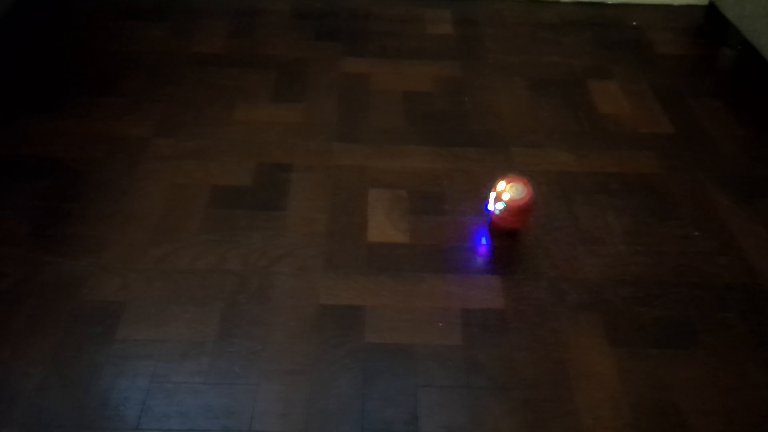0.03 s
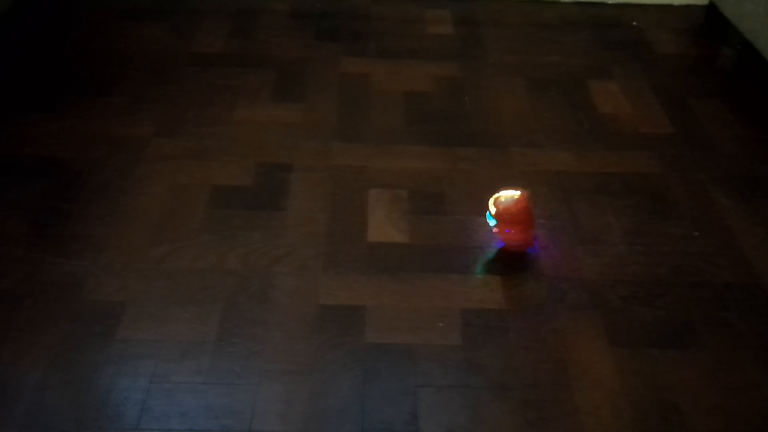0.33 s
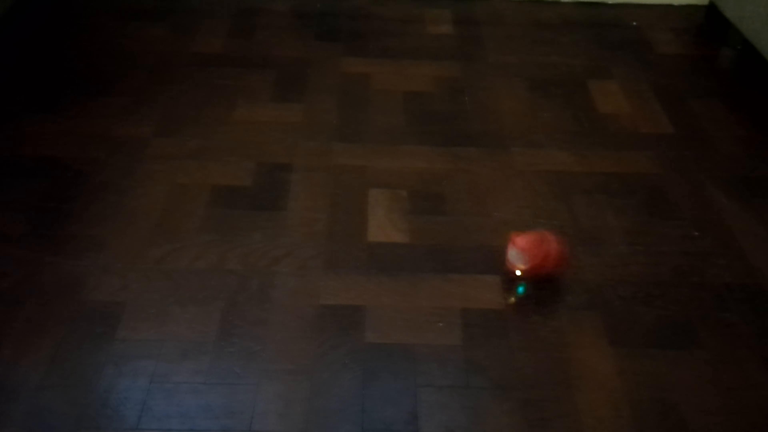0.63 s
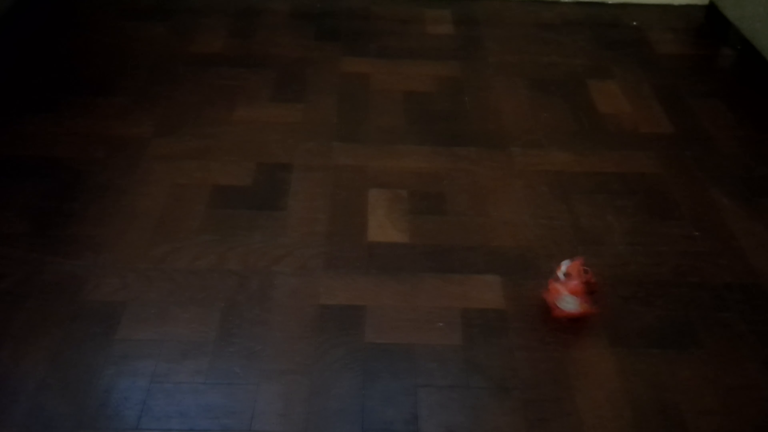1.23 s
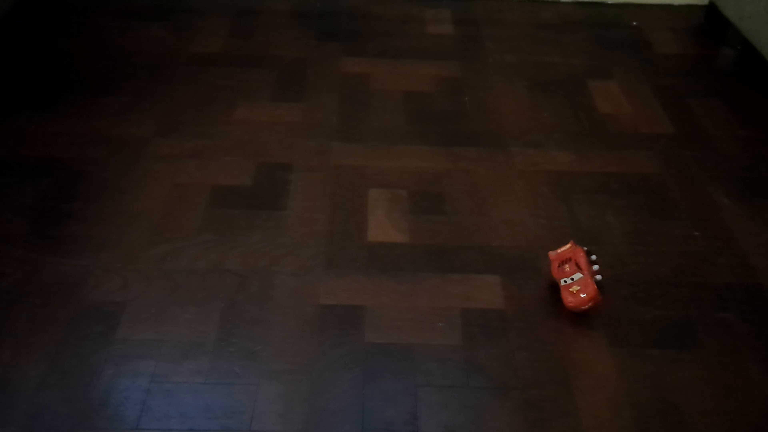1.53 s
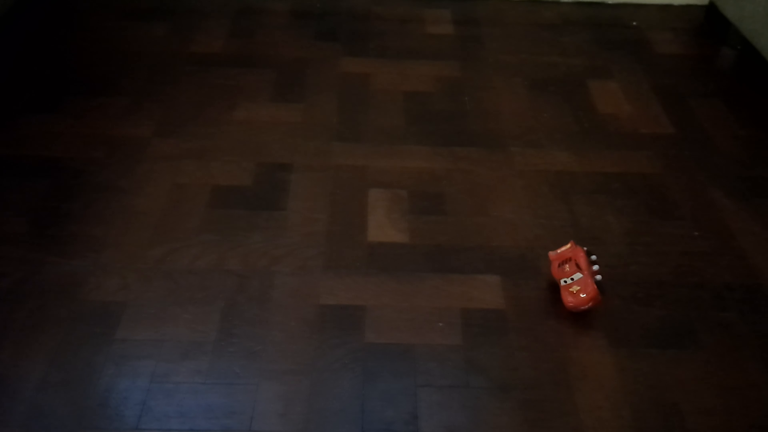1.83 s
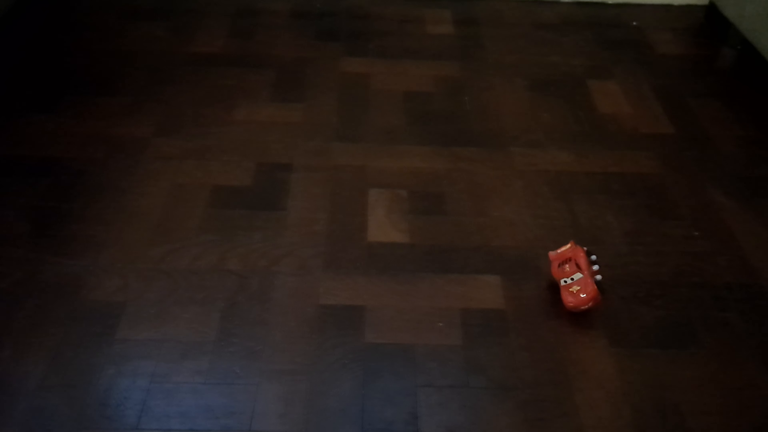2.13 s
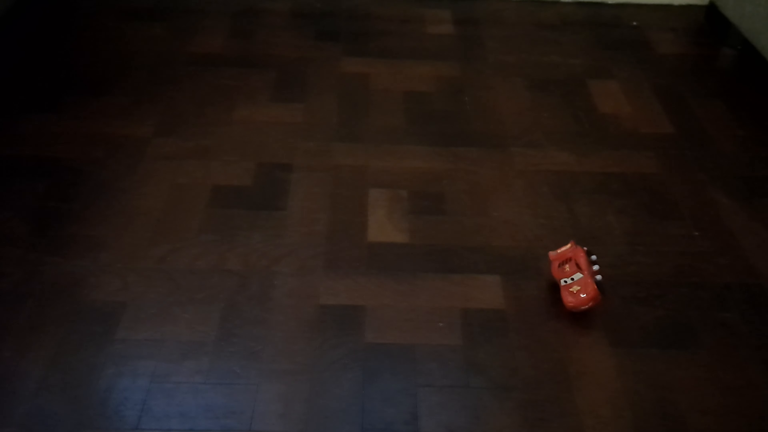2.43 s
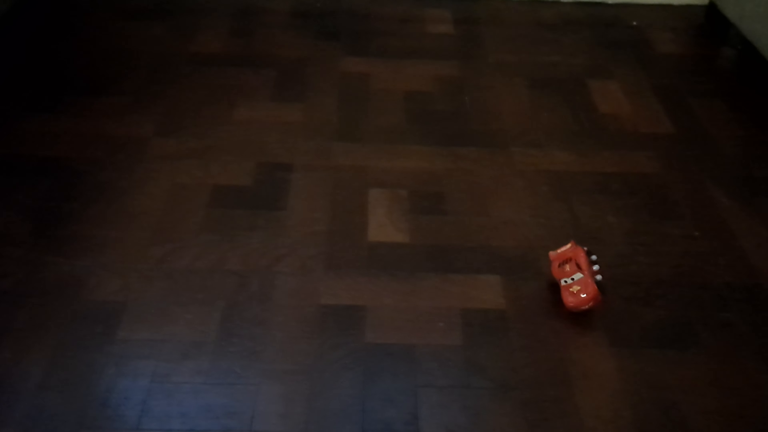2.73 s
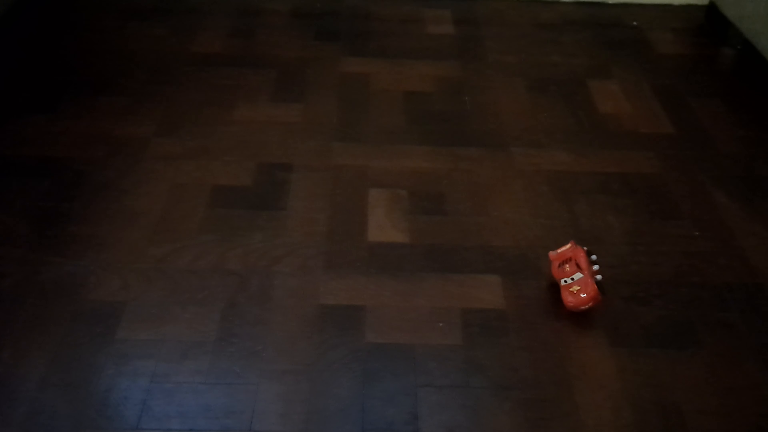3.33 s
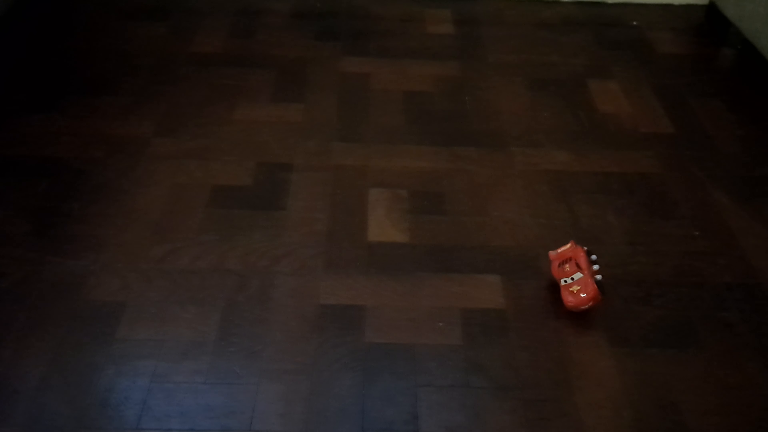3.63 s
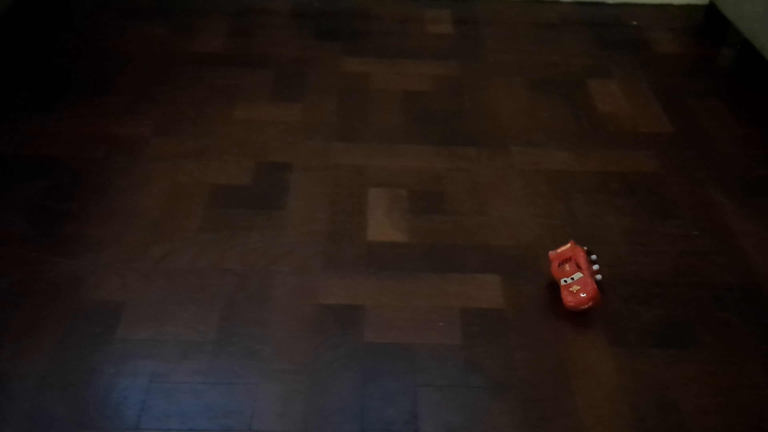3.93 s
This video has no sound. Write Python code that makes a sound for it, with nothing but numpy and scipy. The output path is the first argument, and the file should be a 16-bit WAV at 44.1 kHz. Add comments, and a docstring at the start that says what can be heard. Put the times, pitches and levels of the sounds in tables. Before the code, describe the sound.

A plastic toy top topples on a wooden floor, knocking, rattling and scraping as it turns. It rolls briefly with a fading whirr and stops, leaving the faint hum of a bare room.

```python
"""Spinning top falls on parquet

A plastic toy top loses its balance in a bare room. Its shell knocks on the wood once a turn and
loose parts rattle inside after each knock. It skitters, drops flat, rolls a little way and stops
while its flywheel whirrs down. A mains hum, faint room noise and one far chirp remain."""
import sys
import numpy as np
from scipy import signal
from scipy.fft import rfft, irfft
from scipy.io import wavfile
from scipy.ndimage import uniform_filter1d

SR = 44100
rng = np.random.default_rng(int(sys.argv[2]) if len(sys.argv) > 2 else 0)


def materialize(psi):
    """Save the field psi as 16-bit PCM at rate SR to the path in sys.argv[1].

    A 1-D psi becomes a single channel; in a 2-D psi each row is a channel.
    """
    bounded = np.clip(np.atleast_2d(psi).T, -1, 1)
    quanta = np.round(bounded * 32767).astype(np.int16)
    wavfile.write(sys.argv[1], SR, quanta)


N = 176400
LEAD = int(.1 * SR)  # pre-roll: the first knock lands just before time zero
TIME = np.arange(-LEAD, N) / SR

# stereo width of diffuse sound: freq_hz, left_right_correlation
STEREO_LIKENESS = [(60, .8), (300, .8), (600, .35), (1200, .4), (2500, .3), (5000, 0), (15000, 0)]
# colour of the room noise: freq_hz, relative_db
AIR_SPECTRUM = [(15, -57), (25, -27.5), (56, -16), (160, -11), (204, -29), (227, -17.5), (289, -12.5),
                (359, -12.5), (389, -13), (457, -13), (509, -22.5), (598, -18.5), (850, -33), (1200, -37),
                (1800, -39.5), (2560, -37), (3600, -45), (5730, -51), (15500, -49.5)]
# tones of the mains hum: pitch_hz, level_db
HUM_TONES = [(120, -76), (240.3, -70.5), (317, -72), (360.1, -62.5), (479, -81), (600, -81.5)]
# slaps off near surfaces: delay_s, left_gain, right_gain
REFLECTIONS = [(.0037, 0.3, .2), (0.0161, .14, 0.039)]
# reverb tail: freq_hz, level_db, t60_s, left_minus_right_db
REVERB_BANDS = [(80, 14, .6, -1.5), (154, 13, .6, -2.5), (192, -10, .6, 6.5), (263, 5.5, 0.34, 2),
                (383.2, 6.5, 0.55, 1.5), (700, 0.5, 0.47, 5.5), (1099, -2, 0.54, 7.5),
                (1597, -3, 0.39, -2.5), (2600, -1, 0.38, 2.5), (4500, -2, 0.43, 2), (8250, -4, .38, -2),
                (11200, -4.5, .3, 5.5), (15830, -8, 0.33, -3)]
# lingering tones of the room: pitch_hz, gain_db
ROOM_MODES = [(524, -58.5), (567, -59), (703, -60), (791, -65), (902, -62.5), (1017, -62.5), (1214, -59.5),
              (2017, -70)]
# swell of the rolling rumble: time_s, level_db
ROLL_ENVELOPE = [(1.17, -67), (1.23, -82), (1.33, -50.5), (1.39, -47), (1.45, -51), (1.52, -55),
                 (1.58, -65), (1.7, -80)]
# colour of the rumbling boards: freq_hz, relative_db
ROLL_SPECTRUM = [(30, -13.5), (60, -5), (110, -3), (160, 0), (200, -9.5), (280, 3), (500, -3.5),
                 (1200, -10), (1800, -23), (2500, -15), (5000, -33.5), (15000, -47.5)]
# the flywheel running down: time_s, level_db
WHIRR_ENVELOPE = [(.92, -75), (.945, -51), (1.02, -53), (1.17, -64), (1.22, -51), (1.33, -68), (1.6, -89),
                  (2.3, -100)]
# last rubs before the toy rests: time_s, level_db
SQUEAK_ENVELOPE = [(1.36, -91), (1.41, -68), (1.46, -74), (1.505, -59.5), (1.54, -95)]
# the shell sliding along the wood: time_s, level_db
SCUFF_ENVELOPE = [(0, -44.5), (.04, -45.5), (.09, -69), (.17, -66), (.22, -50), (.29, -63.5), (.4, -54),
                  (.78, -43), (.95, -46.5), (1.06, -38), (1.10, -103), (1.2, -53), (1.28, -56.5),
                  (1.35, -55), (1.46, -70.5), (1.505, -61.5), (1.55, -78)]
# colour of that slide: freq_hz, relative_db
SCUFF_SPECTRUM = [(200, -9), (680, -1.5), (900, -6.5), (1450, -0.5), (2000, 0), (3000, -3), (4200, -2.5),
                  (7000, -6.5), (9000, -10.5), (12000, -12.5), (16000, -17)]
# the plastic case, shaken by its loose parts: pitch_hz, width_hz, gain_db
CASE_RESONANCES = [(693, 130, -1), (1350, 690, -12.5), (2403, 600, -4), (4020, 510, -2), (4650, 650, -4),
                   (5410, 470, -4.5), (6340, 900, -5), (8100, 1600, -8), (11300, 1400, -2.5),
                   (12900, 1500, -5), (15000, 2500, -11)]
# shell and floorboard struck together: pitch_hz, rim_hit_db, side_hit_db, t60_s
KNOCK_MODES = [(829, -14.5, -48.5, 0.0079), (1070, -10, -17, 0.012), (1260, -21.5, -5.5, 0.0051),
               (1560, -40.5, -19.5, 0.0054), (1931, -16, -44.5, 0.015), (2420, -20.5, -16.5, 0.022),
               (2700, -35, -20.5, 0.003), (4400, -23.5, -23.5, 0.0062), (6600, -22, -28.5, 0.011)]
# hits on the floor: start_s, knock_db, rattle_db, rattle_hollow_db, rattle_treble_db, rattle_hold_s
CONTACTS = [(-.022, -21, -7.5, 1, -3, .018), (0.1201, -22.5, -16.5, 1.5, -6, .0055),
            (.1600, -33, -11.5, 0, -0.5, 0.0012), (0.1872, -29.5, -13.5, 0.5, -4, 0.0034),
            (0.3202, -21, -18.5, 6.5, -3, .004), (.3660, -8, -6.5, 2, -1.5, .001),
            (0.4194, -1.5, -9, 0, 0.5, .0023), (.4901, -0.5, -6, -3, -3, 0.0017),
            (.5569, -3, -7.5, -8.5, -1, 0.0026), (.6441, -4.5, -6, -0.5, 0, 0.0015),
            (.7165, -15, -7, 3, 0, 0.006), (0.8131, -11, -21, 0.5, 2.5, .003),
            (.8200, -20.5, -8.5, 1, -4, 0.00042), (.8243, -25, -8.5, 4, -2, 0.00056),
            (0.8904, -12.5, -22, -4, 2, .002), (0.899, -20, -7, 5, -3.5, 0.0089),
            (.9395, -18, -9, -2.5, 0, 0.0042), (0.9758, -16, -18, 3.5, -9.5, 0.0052),
            (1.061, -22, -36, 8, -16, 0.0027), (1.1896, -18.5, -26.5, 4, -24, 0.00067),
            (1.2130, -33, -33, 10, 4.5, 0.002), (1.2204, -20.5, -43, -12, -10, .002)]

FALL_S = .8  # the top lies on its side from here on
RATTLE_BOOST_DB, RATTLE_DELAY_S, RATTLE_DECAY_S = 19, .001, .004


def from_db(db):
    """Decibels to gain."""
    return 10 ** (np.asarray(db) / 20)


def envelope(curve):
    """Fader ride through (time_s, level_db) points, silent after the last."""
    time_s, level_db = np.transpose(curve)
    return from_db(np.interp(TIME, time_s, level_db)) * (TIME < time_s[-1])


def unit_power(x):
    """Scale to an RMS of one."""
    return x / np.sqrt(np.mean(x ** 2) + 1e-20)


def at_hz(rows, hz, column=1):
    """Read a column of a table on a log-frequency axis."""
    rows = np.array(rows)
    return np.interp(np.log(hz + 1), np.log(rows[:, 0]), rows[:, column])


def ring(x, hz, t60_s):
    """A mode in which a unit click starts a dying sine of height about one."""
    radius, angle = from_db(-60 / (t60_s * SR)), 2 * np.pi * hz / SR
    return signal.lfilter([0, np.sin(angle)], [1, -2 * radius * np.cos(angle), radius ** 2], x + 1e-18)


def strike(x, hz, t60_s):
    """A mode with a hard attack: it starts at full height on the click."""
    return np.diff(ring(x, hz, t60_s), prepend=0) / (2 * np.sin(np.pi * hz / SR))


def resonate(x, hz, width_hz):
    """Band-pass resonance with unity gain at its peak."""
    radius, angle = np.exp(-np.pi * width_hz / SR), 2 * np.pi * hz / SR
    feedforward = np.array([1, 0, -1]) * (1 - radius ** 2) / 2
    return signal.lfilter(feedforward, [1, -2 * radius * np.cos(angle), radius ** 2], x + 1e-18)


def diffuse_spectrum(size):
    """Frequencies and stereo spectrum of white noise that arrives from all sides."""
    hz = np.fft.rfftfreq(size, 1 / SR)
    mid, side = rfft(rng.standard_normal((2, size)))
    alike = at_hz(STEREO_LIKENESS, hz)
    return hz, np.sqrt((1 + alike) / 2) * mid + np.sqrt((1 - alike) / 2) * side * [[1], [-1]]


def noise_bed(spectrum):
    """Diffuse stereo noise of a given colour, at unit power."""
    hz, white = diffuse_spectrum(len(TIME))
    return unit_power(irfft(white * from_db(at_hz(spectrum, hz)), len(TIME)))


def crackle(size, clicks_per_s, shared=.51):
    """Random clicks whose strengths are partly alike left and right."""
    centre = np.sqrt(shared) * rng.standard_normal(size)
    sides = np.sqrt(1 - shared) * rng.standard_normal((2, size))
    return (centre + sides) * (rng.random(size) < clicks_per_s / SR)


def room_tone():
    """Steady hum of an appliance over the air of the room, leaning a little left."""
    hum = sum(from_db(db) * np.sqrt(2) * np.sin(2 * np.pi * (hz * TIME + rng.random()))
              for hz, db in HUM_TONES)
    air = from_db(-64.5) * noise_bed(AIR_SPECTRUM)
    return (hum + air) * from_db([[1.1], [-1.1]])


def far_chirp(start_s=3.275, end_s=3.375, fade_s=.05, level_db=-76.5):
    """One faint, raspy chirp far off: a short swell of narrow noise."""
    band = signal.butter(4, [3750, 4500], "band", fs=SR, output="sos")
    rasp = unit_power(signal.sosfilt(band, rng.standard_normal((2, len(TIME)))))
    swell = np.clip(np.minimum(TIME - start_s, end_s - TIME) / fade_s + .5, 0, 1)
    return from_db(level_db) * swell * rasp


def room_response(predelay_s=.00065, build_s=.008, path_spread=.031):
    """The room from one spot: two near reflections and a tail that dies sooner in the treble."""
    t = np.arange(SR) / SR
    hz, white = diffuse_spectrum(SR)
    pan_db = at_hz(REVERB_BANDS, hz, column=3) * np.array([[.5], [-.5]])
    wash = white * from_db(at_hz(REVERB_BANDS, hz) + pan_db)
    attack = 1 - np.exp(-np.maximum(t - predelay_s, 0) / build_s)
    edges_hz = np.r_[0, np.geomspace(700, 16000, 7), SR]
    response = np.zeros((2, SR))
    for low, high in zip(edges_hz, edges_hz[1:]):
        t60_s = at_hz(REVERB_BANDS, (low + high) / 2, column=2)
        fade = attack * from_db(-60 * t / t60_s)
        band = irfft(wash * (hz >= low) * (hz < high), SR)
        response += band * fade / np.sqrt(np.sum(fade ** 2))
    for delay_s, *gains in REFLECTIONS:
        taps = delay_s * SR * (1 + path_spread * rng.uniform(-1, 1, 2))
        response[[0, 1], taps.astype(int)] += gains
    return response


def reverb(toy, spots=6):
    """The toy moves, so successive hits excite the room from different spots; a few tones linger."""
    spot = np.searchsorted(np.array(CONTACTS)[:, 0] - RATTLE_DELAY_S, TIME) % spots
    sends = uniform_filter1d(1. * (spot == np.arange(spots)[:, None]), size=88)  # 2 ms crossfades
    wet = sum(signal.fftconvolve(toy[:1] * send, room_response(), axes=1) for send in sends)
    tones = sum(from_db(db) * ring(toy[0], hz, t60_s=.52) for hz, db in ROOM_MODES)
    return wet[:, :len(TIME)] + tones * from_db([[1.5], [-1.5]])


def direct_sound(toy):
    """Each side gets its own presence lift; the left is turned up and arrives a hair later."""
    left = toy[0] + .41 * resonate(toy[0], hz=1900, width_hz=650)
    right = toy[1] + .66 * resonate(toy[1], hz=4600, width_hz=2500)
    return np.array([from_db(1.5) * np.roll(left, 3), right])


def rolling():
    """The boards rumble as the fallen top rolls a little way."""
    return envelope(ROLL_ENVELOPE) * noise_bed(ROLL_SPECTRUM)


def flywheel_whirr(pitch_hz=2600, stage_width_hz=520):
    """The coasting flywheel rubs in its bearing and keeps one narrow resonance sounding."""
    rub = resonate(rng.standard_normal(len(TIME)), pitch_hz, stage_width_hz)
    whirr = resonate(rub, pitch_hz, stage_width_hz)
    return envelope(WHIRR_ENVELOPE) * unit_power(whirr)


def squeak():
    """A thin rub as the toy comes to rest."""
    rub = resonate(rng.standard_normal(len(TIME)), hz=4000, width_hz=120)
    return envelope(SQUEAK_ENVELOPE) * unit_power(rub)


def scuffing():
    """Tiny catches on the wood grain as the shell slides."""
    size = len(TIME)
    accent_db = .5 * np.minimum(rng.exponential(1, size), 3)
    grains = from_db(accent_db) * crackle(size, clicks_per_s=1400)
    colour = from_db(at_hz(SCUFF_SPECTRUM, np.fft.rfftfreq(size, 1 / SR)))
    return envelope(SCUFF_ENVELOPE) * unit_power(irfft(rfft(grains) * colour, size))


def plastic_case(clicks, hollow_db, treble_db):
    """Clicks ring the case; its resonances shift at random, as each hit lands on another side."""
    out = 0
    for k, (hz, width_hz, db) in enumerate(CASE_RESONANCES):
        detune, scatter_db = rng.uniform(-1, 1, 2) * [.07, 2]
        tone_db = hollow_db * (hz < 1000) + treble_db * (hz > 7500)
        gain = (-1) ** k * from_db(db + scatter_db + tone_db)  # neighbours alternate in polarity
        out = out + gain * resonate(clicks, hz * (1 + detune), width_hz)
    return out


def rattles():
    """Just after each hit the loose parts chatter against the case for a few milliseconds."""
    t = np.arange(SR // 20) / SR
    out = np.zeros((2, len(TIME)))
    for start_s, _, rattle_db, hollow_db, treble_db, hold_s in CONTACTS:
        fade = np.exp(-np.maximum(t - hold_s, 0) / RATTLE_DECAY_S)
        burst = fade * crackle(len(t), clicks_per_s=6000)
        energy = np.sum(burst ** 2, axis=1, keepdims=True)
        burst *= from_db(RATTLE_BOOST_DB + rattle_db) / np.sqrt(energy + 1e-20)
        onset = LEAD + int((start_s + RATTLE_DELAY_S) * SR)
        out[:, onset:onset + len(t)] += plastic_case(burst, hollow_db, treble_db)
    return out


def knocks(soften_hz=3260):
    """Shell strikes floorboard: a round clack on the rim, a thinner one once it lies on its side."""
    out = np.zeros(len(TIME))
    click = signal.unit_impulse(SR // 10)
    for start_s, knock_db, *_ in CONTACTS:
        onset = LEAD + int(start_s * SR)
        for hz, rim_db, side_db, t60_s in KNOCK_MODES:
            scatter_db, detune = rng.standard_normal(2) * [1.5, .02]
            mode_db = rim_db if start_s < FALL_S else side_db
            gain = from_db(knock_db + mode_db + scatter_db)
            out[onset:onset + len(click)] -= gain * strike(click, hz * (1 + detune), t60_s)
    wood_softening = signal.butter(1, soften_hz, fs=SR, output="sos")
    return signal.sosfilt(wood_softening, out)


def scene():
    """The toy and its reverb over rumbling boards, room tone and the far chirp."""
    toy = knocks() + rattles() + scuffing() + squeak() + flywheel_whirr()
    low_cut = signal.butter(2, 270, "high", fs=SR, output="sos")  # a small toy radiates little bass
    toy = signal.sosfilt(low_cut, toy)
    mix = direct_sound(toy) + reverb(toy) + rolling() + room_tone() + far_chirp()
    return mix[:, LEAD:]


def record(dry, ceiling=.63, cutoff_hz=15800):
    """Soft clipping rounds the sharpest peaks, then a steep low-pass trims the top end."""
    rounded = ceiling * np.tanh(dry / ceiling)
    return signal.sosfilt(signal.ellip(10, .2, 80, cutoff_hz, fs=SR, output="sos"), rounded)


dry = scene()
out = record(dry)
materialize(out)
```